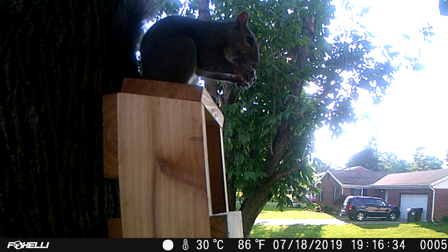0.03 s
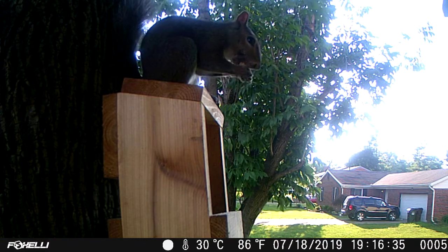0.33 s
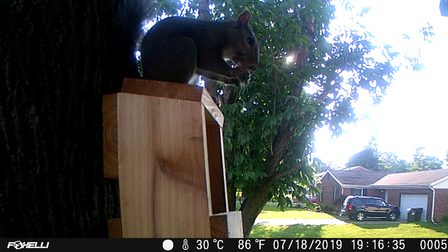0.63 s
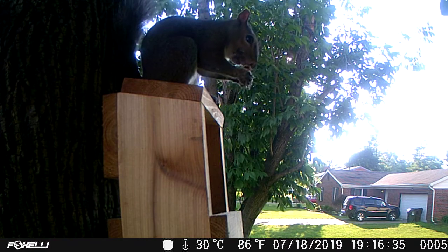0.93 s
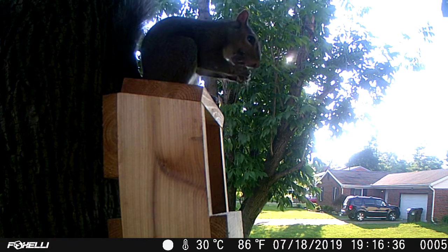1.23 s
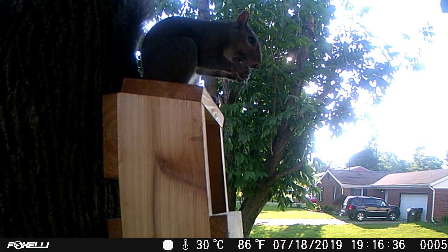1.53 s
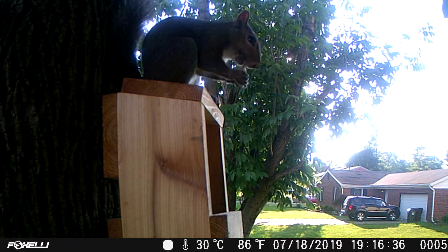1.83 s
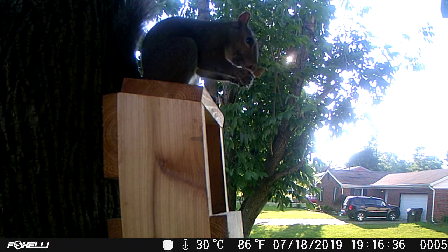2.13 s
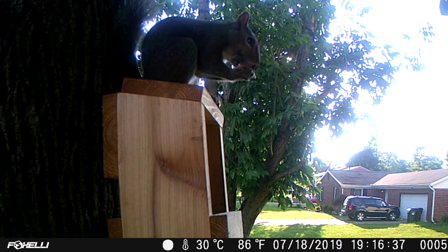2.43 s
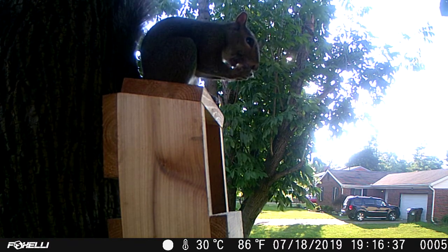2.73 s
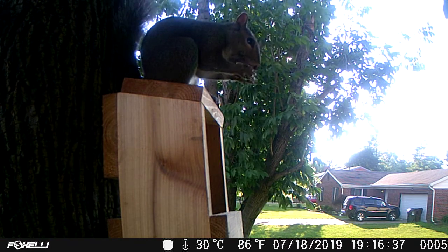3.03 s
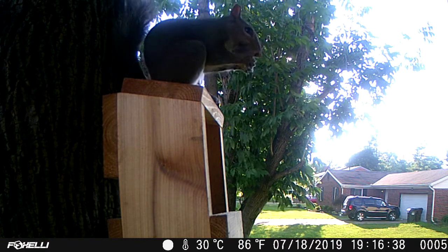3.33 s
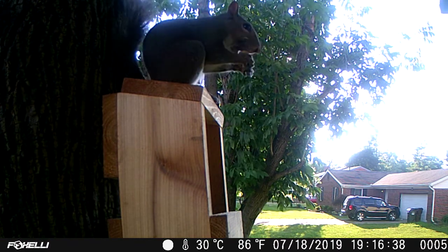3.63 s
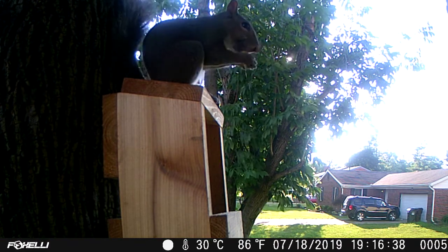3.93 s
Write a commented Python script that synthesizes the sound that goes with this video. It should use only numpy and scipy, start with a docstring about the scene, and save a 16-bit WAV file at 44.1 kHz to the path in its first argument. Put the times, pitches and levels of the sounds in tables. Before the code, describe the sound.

Quiet outdoor air rumbles and hisses on a small yard microphone while a far hoot, perhaps a dog, repeats. A nearby squirrel gives a few faint shell clicks, then a very faint thin whine comes and goes.

```python
"""A quiet summer yard, heard from a small camera beside a wooden feeder where a squirrel nibbles.
It opens on a bed of low air rumble and steady hiss; a far, blurred hoot, perhaps a dog, comes
about once a second. In the first second the squirrel's teeth crack a seed shell in four tiny double
clicks, over three soft low thumps. Two fainter bites follow around 1.5 s.
Through the second half a thin whine fades in and out behind the hoots."""
import sys
import numpy as np
from scipy import signal
from scipy.fft import rfft, irfft, next_fast_len
from scipy.io import wavfile
from scipy.ndimage import map_coordinates

SR = 44100
rng = np.random.default_rng(int(sys.argv[2]) if len(sys.argv) > 2 else 0)


def unload_audio(sound):
    """Save the sound as a 16-bit wav file, at the path given as the first command line argument."""
    columns = np.transpose(np.atleast_2d(sound))
    # keep every value between -1 and 1, then stretch to whole-number steps
    steps = np.round(np.clip(columns, -1, 1) * 32767)
    wavfile.write(sys.argv[1], SR, steps.astype(np.int16))


N = 176400

# fader ride of the air rumble: t/s, level/dB
RUMBLE_LEVEL = [(0, -45), (.4, -50), (.8, -52), (1.12, -52.5), (1.32, -47.5), (1.55, -51.5), (1.68, -49),
                (1.84, -55), (1.95, -47.5), (2.25, -48.5), (2.65, -48), (2.85, -48.5), (3.3, -48),
                (3.68, -48), (3.82, -45.5), (4, -47.5)]
# colour of the air rumble: f/Hz, level/dB
RUMBLE_EQ = [(10, 1), (25, 4.5), (45, 0.5), (65, -5.5), (90, -4), (125, -8.5), (160, -19.5), (250, -40),
             (500, -68), (1000, -120)]
# fader ride of the distant outdoor wash: t/s, level/dB
WASH_LEVEL = [(0, -62.5), (1.4, -63), (2.2, -63), (3.0, -63), (4, -64)]
# colour of the wash: f/Hz, level/dB
WASH_EQ = [(40, -13), (120, 1), (200, -1.5), (270, -7.5), (370, -12), (600, -18.5), (1000, -23),
           (1800, -28), (2750, -33), (3150, -40.5), (5000, -71), (9000, -92.5)]
# colour of the microphone's own hiss: f/Hz, level/dB
HISS_EQ = [(500, 4.5), (3150, -6), (3400, -2), (4200, -4.5), (5100, -8), (6200, -5.5), (7150, -3),
           (7700, -5.5), (8400, -16), (9000, -28)]
# fader ride of the thin whine: t/s, level/dB
WHINE_LEVEL = [(0, -105.5), (1.6, -94), (2.0, -91.5), (2.45, -101), (2.67, -86.5), (2.95, -99.5),
               (3.2, -96), (3.48, -84), (3.75, -100), (4, -92.5)]
# soft low thumps: centre t/s, level/dB, f/Hz
THUMPS = [(0.34, -36, 44.1), (0.492, -37.5, 26.25), (0.675, -38.5, 40.1)]
# hoot cues: start t/s, hold t/s, level/dB, relative level of the higher pitch/dB
HOOTS = [(.02, 0.08, -73, -9.5), (0.72, 0.39, -72.5, -12), (1.617, 0.28, -72.5, -2.5),
         (2.411, 0.12, -72, -5.5), (3.13, 0.14, -72.5, -4), (3.73, 0.13, -76.5, -1.5)]
# colour of a hoot at its starting pitch: f/Hz, level/dB
HOOT_LOWER_EQ = [(250, -22), (340, -10.5), (410, -2), (450, 3), (485, -5), (590, -22), (800, -35),
                 (1200, -73)]
# colour of a hoot at its higher pitch: f/Hz, level/dB
HOOT_UPPER_EQ = [(400, -24), (490, -4), (530, 1.5), (570, -6), (650, -15), (1200, -56)]
# bite cues: t/s, gain/dB, trim of the snap and the low shell modes/dB, pitch ratio of those modes
BITES = [(.3326, -82, -10, 1), (0.46, -74.5, 3.5, 1.09), (0.5454, -68.5, -4.5, 0.87),
         (.6572, -78.5, -6, .9), (1.3626, -84, -8, 1), (1.5472, -82, -5, 1)]
# the two cracks within a bite: delay t/s, gain/dB
CRACKS = [(0, 3), (.0035, 1)]
# ringing modes of the seed shell: f/Hz, level/dB, t60/s
SHELL_MODES = [(4270, -2.5, 0.009), (4650, -2, 0.007), (5150, -4, 0.0073), (7140, 2, 0.013),
               (7600, -4.5, 0.013)]


def amp(db):
    """Decibels to gain."""
    return 10 ** (np.asarray(db) / 20)


def unit(x):
    """Scale to rms 1."""
    return x / np.sqrt(np.mean(x ** 2) + 1e-20)


def curve(rows):
    """One value per sample from (s, value) points."""
    return np.interp(np.arange(N) / SR, *np.transpose(rows))


def wobble(rate):
    """A smooth random curve, rate knots a second."""
    return map_coordinates(rng.standard_normal(int(N * rate / SR) + 4), [np.arange(N) * rate / SR])


def noise(spectrum):
    """Noise of rms 1, coloured by (Hz, dB) points on a log axis."""
    m = next_fast_len(N + SR // 2)
    hz, db = np.transpose(spectrum)
    gain = amp(np.interp(np.log(np.fft.rfftfreq(m, 1 / SR) + 1), np.log(hz + 1), db))
    return unit(irfft(rfft(rng.standard_normal(m)) * gain, m)[:N])


def low_pass(x, top_hz):
    """Remove everything above top_hz."""
    m = next_fast_len(N + SR // 2)
    return irfft(rfft(x, m) * (np.fft.rfftfreq(m, 1 / SR) < top_hz), m)[..., :N]


def air():
    """The bed: an uneven low rumble, the drifting wash of the neighbourhood and microphone hiss."""
    drift_db, hiss_db = 1.27, -83.5
    rumble = amp(curve(RUMBLE_LEVEL)) * noise(RUMBLE_EQ)
    wash = amp(curve(WASH_LEVEL) + drift_db * wobble(3.7)) * noise(WASH_EQ)
    return rumble + wash + amp(hiss_db) * noise(HISS_EQ)


def whine():
    """One faint, slightly unsteady tone that fades in and out."""
    pitch_hz, wander_hz = 1356, 3
    hz = pitch_hz + wander_hz * wobble(20)
    return amp(curve(WHINE_LEVEL)) * unit(np.sin(2 * np.pi * np.cumsum(hz) / SR))


def thumps():
    """Probably air on the microphone: about one slow pressure cycle each, with rumble fluttering on it."""
    t, out = np.arange(N) / SR, np.zeros(N)
    width_s = 0.022
    flutter = 0.5 * noise(RUMBLE_EQ)
    for centre, db, hz in THUMPS:
        swell = amp(db) * np.exp(-((t - centre) / width_s) ** 2)
        out += swell * (np.sin(2 * np.pi * (hz * t + rng.random())) + flutter)
    return out


def far_hoots():
    """Echoes blur each distant call into a band of noise that swells, lifts in pitch and dies away."""
    attack_s, lift_delay_s, tail_t60_s = 0.055, 0.054, 0.98
    t, lower, upper = np.arange(N) / SR, np.zeros(N), np.zeros(N)
    for start, hold, db, upper_db in HOOTS:
        age = t - start
        fade = amp(db - 60 * np.maximum(age - hold, 0) / tail_t60_s)
        lower += fade * np.clip(age / attack_s, 0, 1)
        upper += fade * amp(upper_db) * np.clip((age - lift_delay_s) / (hold / 2), 0, 1)
    return lower * noise(HOOT_LOWER_EQ) + upper * noise(HOOT_UPPER_EQ)


def shell_crack(modes, snap_trim_db):
    """One crack in three layers: a dry snap, the shell's ring and a short crunch exciting that ring."""
    attack_s, snap_t60_s, crunch_t60_s = 0.00039, 0.0072, 0.02
    snap_db, crunch_db = -9, -9.5
    t = np.arange(SR // 20) / SR
    attack = 1 - np.exp(-t / attack_s)
    ring = attack * sum(amp(db - 60 * t / t60) * np.sin(2 * np.pi * (hz * t + rng.random()))
                        for hz, db, t60 in modes)
    grit = amp(-60 * t / crunch_t60_s) * rng.standard_normal(len(t))
    crunch = signal.fftconvolve(grit / np.linalg.norm(grit), ring)[:len(t)]
    snap = attack * amp(snap_db + snap_trim_db - 60 * t / snap_t60_s) * rng.standard_normal(len(t))
    return snap + ring + amp(crunch_db) * crunch


def squirrel():
    """Each bite cracks the seed shell twice; its low modes shift with the place where the teeth grip."""
    split_hz = 6000  # modes above this keep their pitch
    out = np.zeros(N + SR)
    for start, bite_db, trim_db, pitch in BITES:
        modes = [(hz * pitch, db + trim_db, t60) if hz < split_hz else (hz, db, t60)
                 for hz, db, t60 in SHELL_MODES]
        for delay, crack_db in CRACKS:
            crack = amp(bite_db + crack_db) * shell_crack(modes, trim_db)
            out[round((start + delay) * SR):][:len(crack)] += crack
    return out[:N]


def scene():
    """The mono mix: everything meets at one microphone."""
    return (air() + thumps() + squirrel() + far_hoots() + whine())[None]


def record(dry):
    """The camera cuts the yard's top end; only a trace of even electronic hiss reaches higher."""
    yard = low_pass(dry, top_hz=8764)
    electronic_hiss = amp(-100) * rng.standard_normal(N)
    return low_pass(yard + electronic_hiss, top_hz=15800)


dry = scene()
out = record(dry)
unload_audio(out)
```